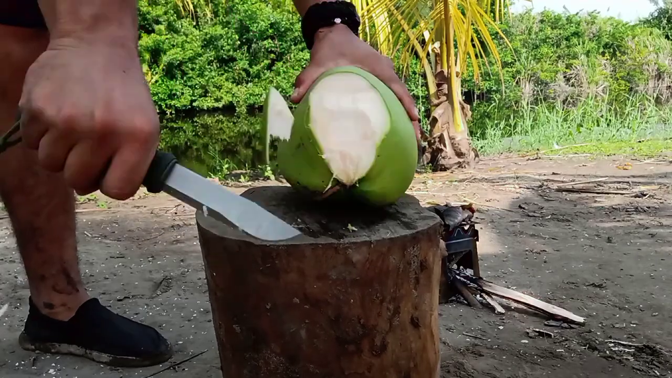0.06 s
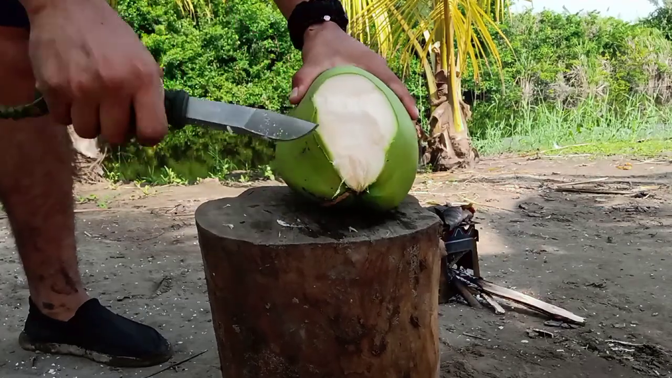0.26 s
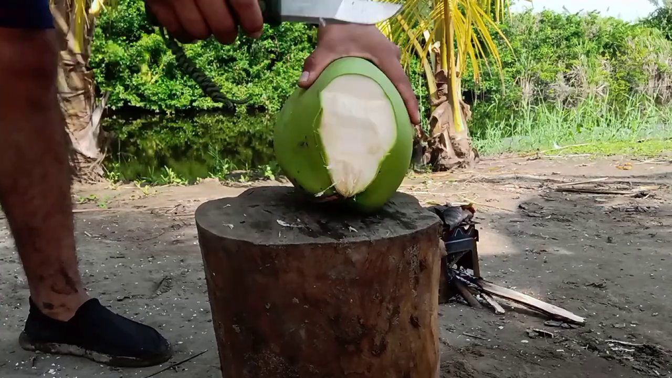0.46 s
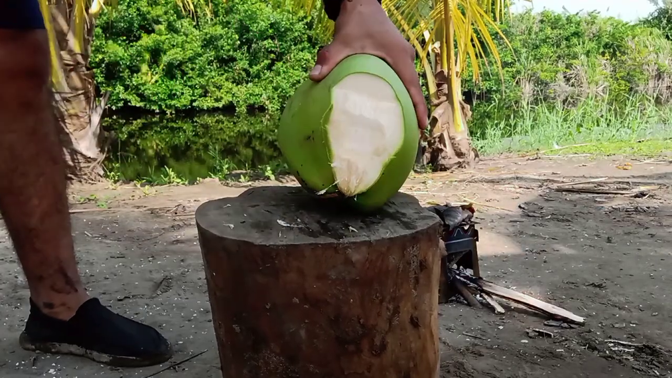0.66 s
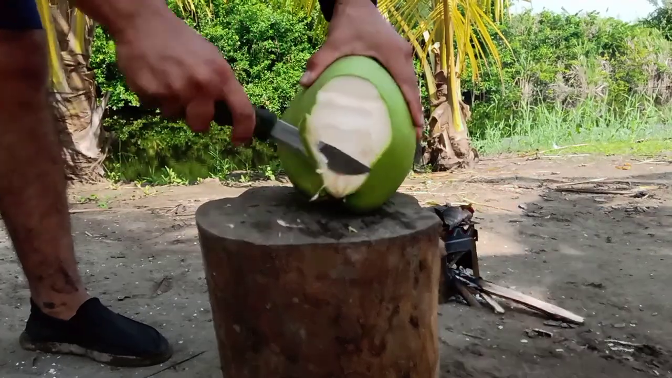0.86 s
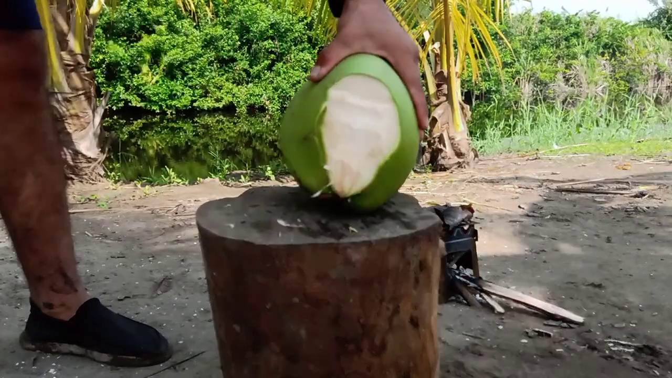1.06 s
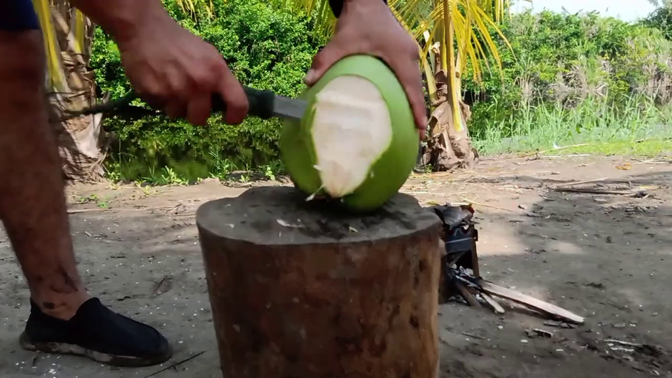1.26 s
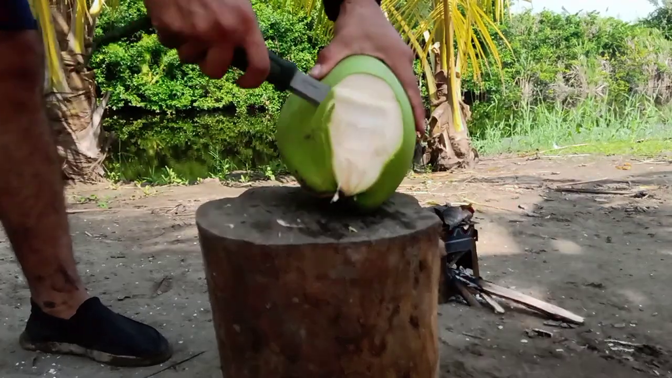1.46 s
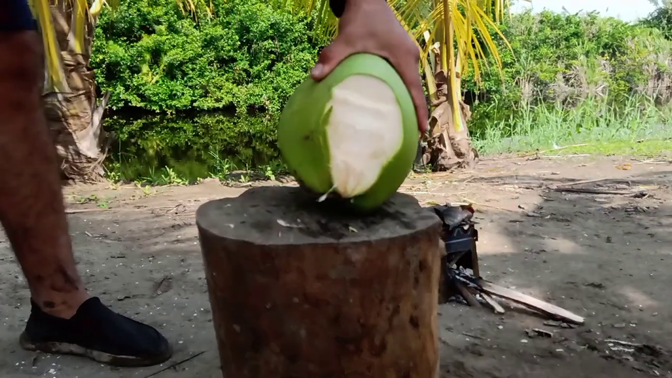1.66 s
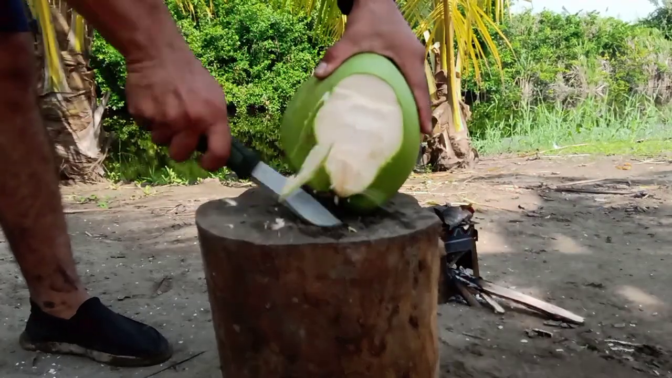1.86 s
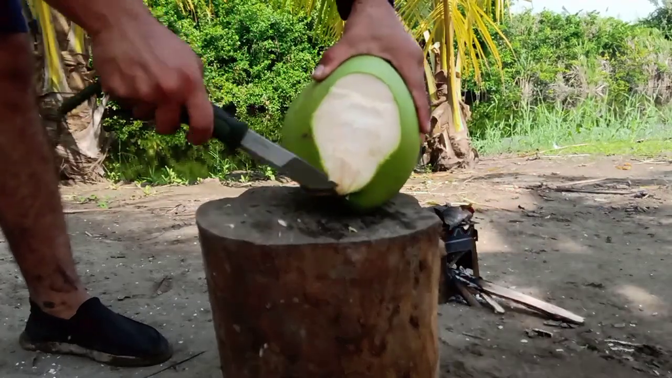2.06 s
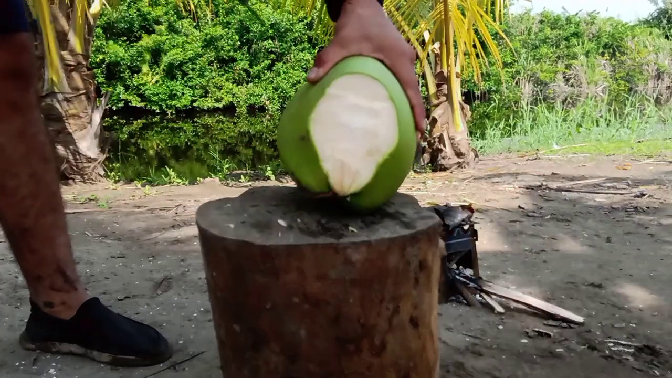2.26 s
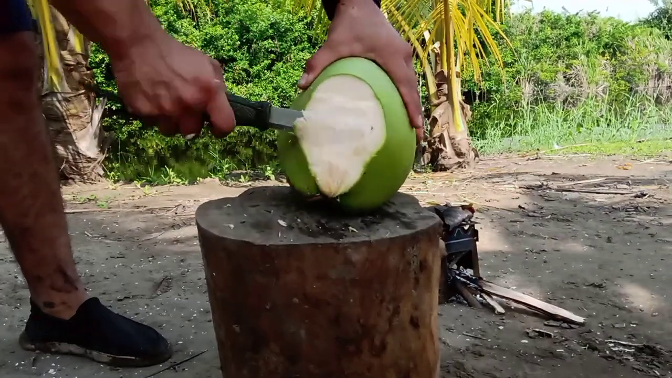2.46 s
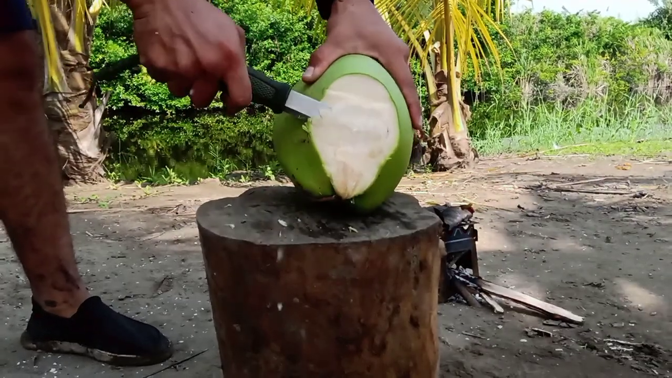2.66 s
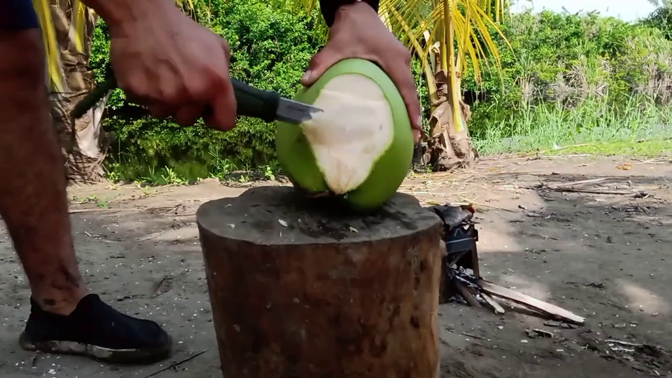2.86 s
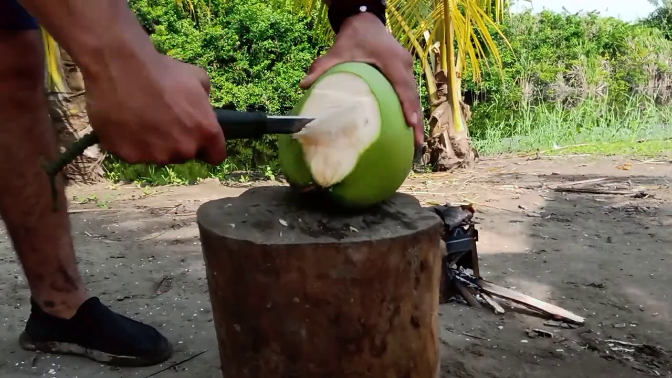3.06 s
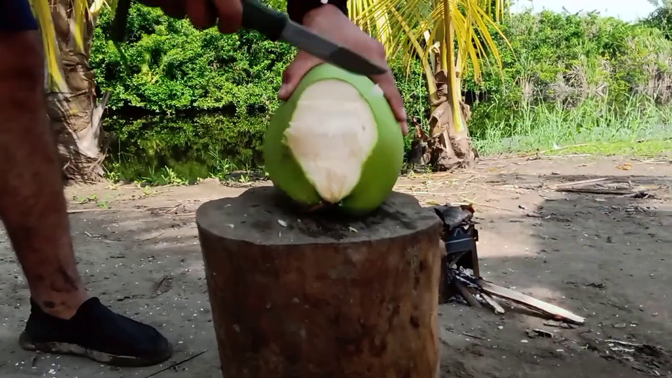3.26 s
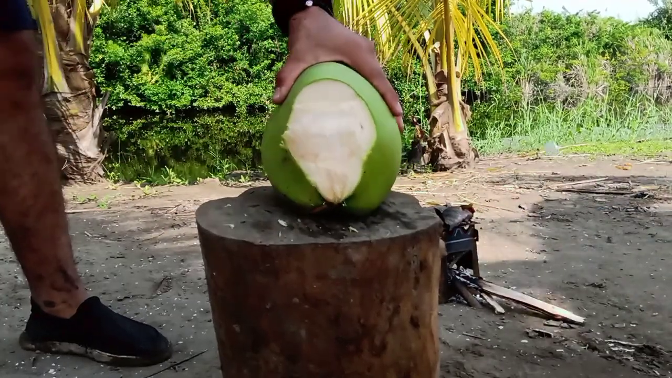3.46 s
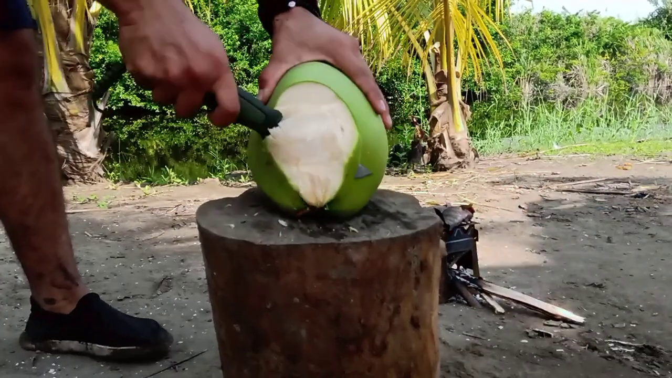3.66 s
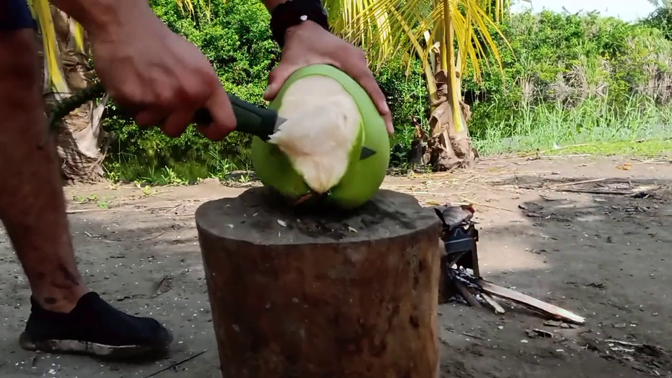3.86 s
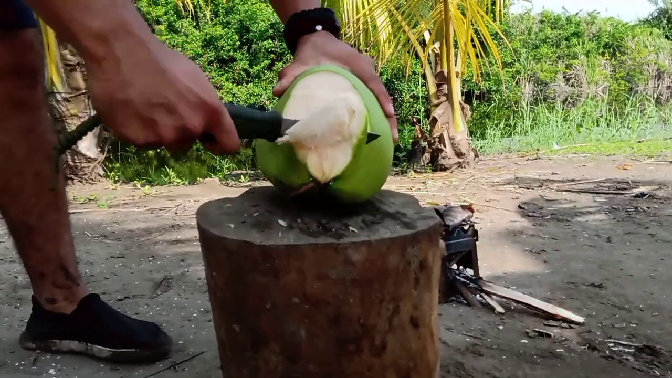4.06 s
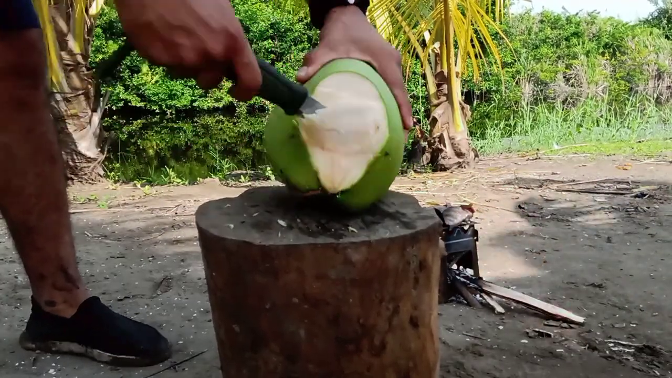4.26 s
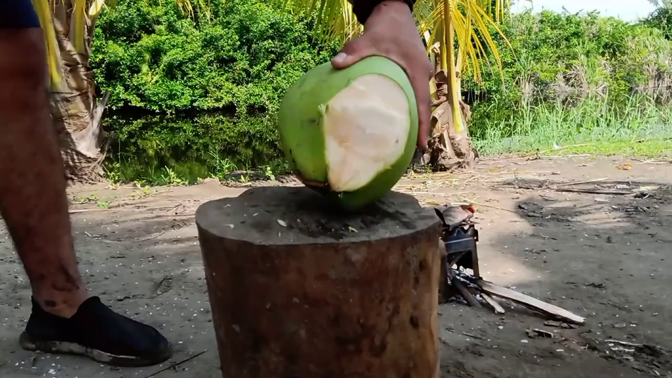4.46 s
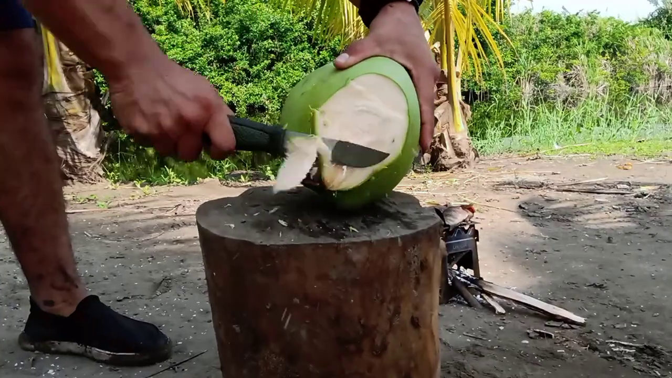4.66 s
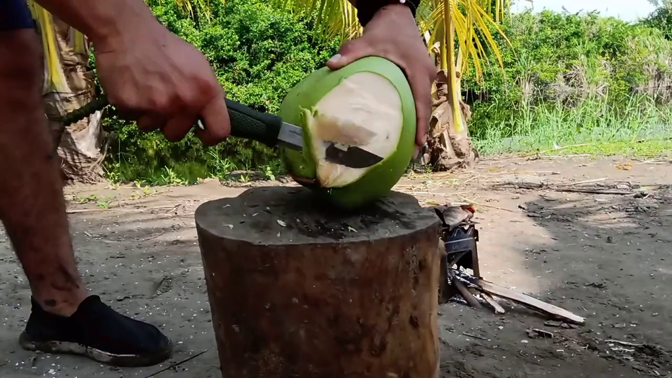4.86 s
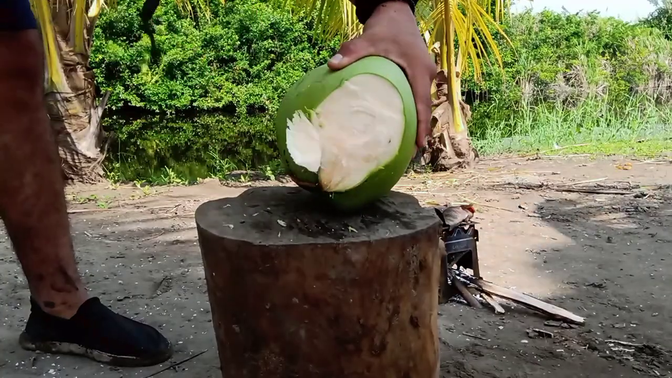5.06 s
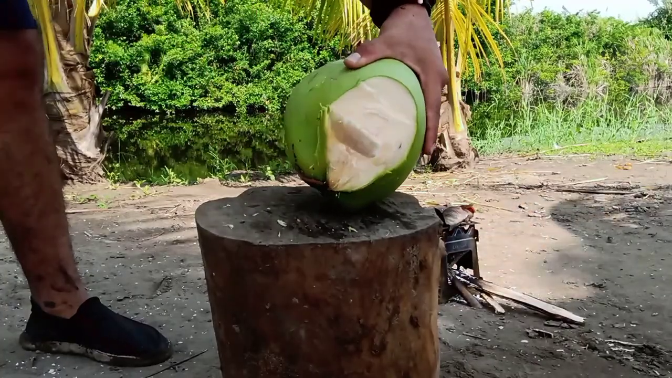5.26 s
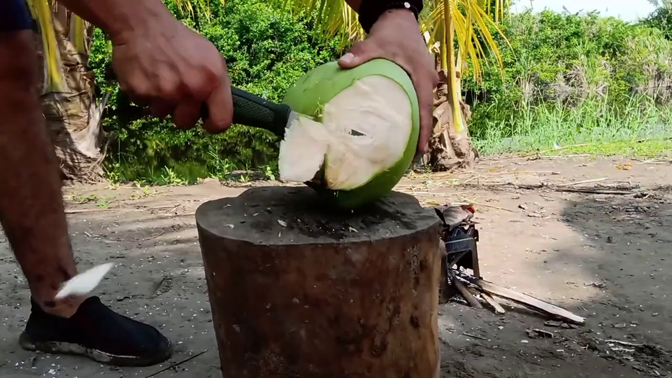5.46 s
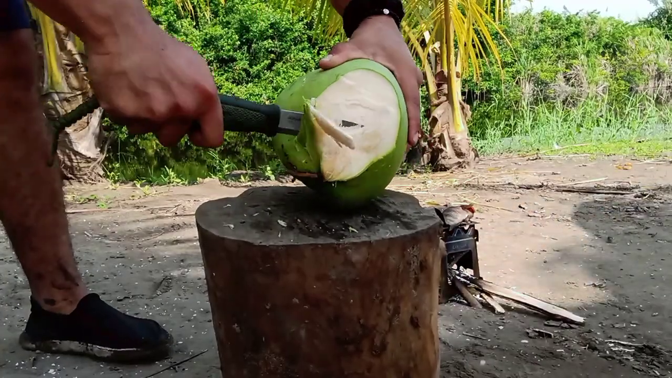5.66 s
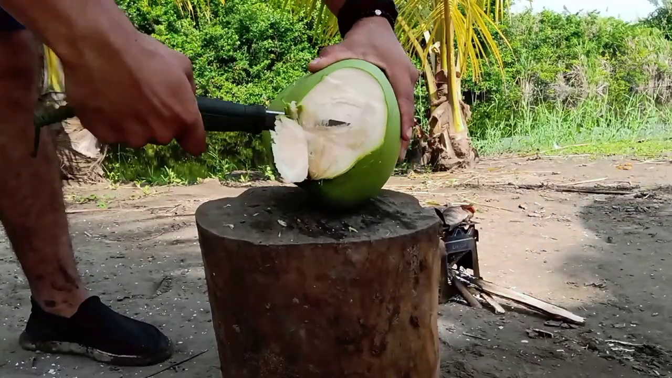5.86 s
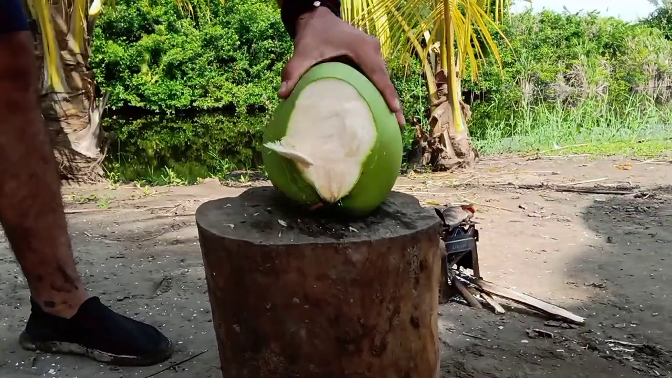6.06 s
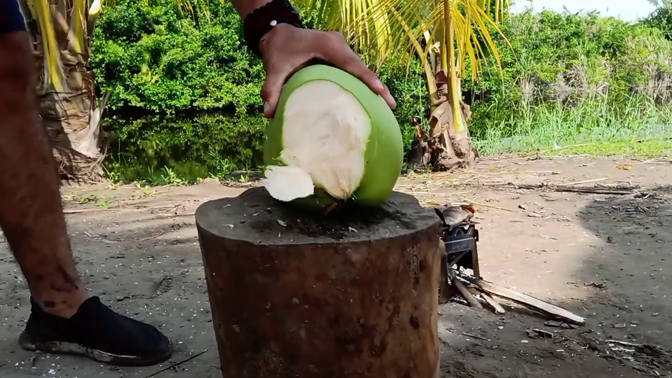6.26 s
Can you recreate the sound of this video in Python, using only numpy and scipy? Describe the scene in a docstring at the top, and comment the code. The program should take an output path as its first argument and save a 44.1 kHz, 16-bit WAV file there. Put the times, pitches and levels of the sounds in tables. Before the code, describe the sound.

Close outdoors, a large knife chops a green coconut resting on a stump. Seven or so sharp woody blows fall roughly half a second to a second apart, each a bright crack, fibrous tear and short hollow knock with a grainy spray. Between them come crackling shaves, little snaps and soft taps. Faint leaf hiss, a distant bird and low wind buffets lie behind; the microphone sounds slightly dull on top.

```python
"""Sharp, woody chops ring out close by: a big knife cuts the husk off a green coconut on a stump, outdoors.
Each chop knocks the nut's damped modes, thuds the stump and bursts a few milliseconds of fibres, then
a grainy spray; taps, crackling shaves and sharp ruptures of husk sound during the chops and between them.
Plants scatter a faint echo of decaying noise. Behind are hissing leaves and distant sounds of shaped noise,
low wind buffets on the microphone and a far bird of sliding, wavering tones."""
import sys
import numpy as np
from scipy import signal
from scipy.fft import rfft, irfft, next_fast_len
from scipy.io import wavfile
from scipy.ndimage import uniform_filter1d

SR = 44100
rng = np.random.default_rng(int(sys.argv[2]) if len(sys.argv) > 2 else 0)


def master_out(mix):
    """Clip the mix to full scale and print it as 16-bit PCM to the path in sys.argv[1]."""
    frames = np.transpose(np.atleast_2d(mix))
    ceiling = np.clip(frames, -1, 1)
    pcm = np.round(ceiling * 32767).astype(np.int16)
    wavfile.write(sys.argv[1], SR, pcm)


N = 278271
TIME = np.arange(N) / SR  # whole scene [s]
HIT = np.arange(4096) / SR  # one short contact [s]


def undb(db):
    """Decibels to gain."""
    return 10 ** (np.asarray(db) / 20)


def unit(x):
    """Scale to rms 1."""
    return x / np.sqrt(np.mean(x ** 2))


def burst(x, db):
    """Scale a short sound to the energy of 10 ms at this level."""
    return x * undb(db) / np.sqrt(np.sum(x ** 2) / (SR / 100))


def add(out, start_s, x):
    """Mix x into out from this time, or from the beginning if the time is negative."""
    i = max(int(start_s * SR), 0)
    out[i:i + len(x)] += x[:N - i]


def band(x, hz, octaves, order=2):
    """Causal band-pass around a centre."""
    edges = [hz * 2 ** (-octaves / 2), hz * 2 ** (octaves / 2)]
    edges = np.clip(edges, 10, SR / 2 - 100)
    return signal.sosfilt(signal.butter(order, edges, "bandpass", fs=SR, output="sos"), x)


def colour(x, points):
    """Shape a spectrum by (frequency [Hz], gain [dB]) points joined on a logarithmic frequency axis."""
    point_hz, point_db = np.transpose(points)
    size = next_fast_len(2 * len(x))
    hz = np.maximum(np.arange(size // 2 + 1) * SR / size, 1)
    gain = undb(np.interp(np.log(hz), np.log(point_hz), point_db))
    return irfft(rfft(x, size) * gain, size)[:len(x)]


def walk(rate):
    """Slow chance of rms 1: random levels held 1 / rate s and slewed twice."""
    hold = int(SR / rate)
    steps = np.repeat(rng.standard_normal(N // hold + 1), hold)
    slewed = uniform_filter1d(uniform_filter1d(steps, hold), hold)
    return unit(slewed[:N])


def fibres(size, per_s, spread_db):
    """Tiny ruptures at random moments, uneven in strength and of either sign."""
    chance = rng.random(size)
    strength = rng.standard_normal(size)
    sign = rng.choice([-1, 1], size)
    return (chance < per_s / SR) * sign * undb(spread_db * strength)


def bite(length_s, release_s):
    """Fibres burst densely while the edge advances and die away once it stops."""
    sinking = np.minimum(0.13 + HIT / (0.7 * length_s), 1)
    release = np.exp(-np.maximum(HIT - length_s, 0) / release_s)
    return fibres(len(HIT), 20000, 2.5) * sinking * release


def plants(x, t60=0.13, build_s=0.041):
    """Ground, trunks and foliage scatter a diffuse echo: noise that builds up, then decays."""
    t = TIME[:SR]
    decay = np.exp(-np.log(1000) * t / t60)
    build = 1 - np.exp(-(t / build_s) ** 2)
    response = rng.standard_normal(SR) * decay * build
    return signal.fftconvolve(x, response / np.linalg.norm(response))[:N]


def wind_strength():
    """Low wind buffets unevenly throughout and freshens once to a light breeze; short gusts ride on it."""
    # gusts at the microphone: (time [s], level [dB])
    gusts = [(3.554, -43.5), (4.125, -52), (4.83, -61), (5.35, -58), (5.841, -53.5)]
    gust_s = 0.032  # rise and fall
    calm_db, breeze_db, freshens_s, freshen_takes_s = -77.5, -68.5, 3.54, 0.96
    base_db = np.interp(TIME, [freshens_s, freshens_s + freshen_takes_s], [calm_db, breeze_db])
    buffets_db = 4.5 * walk(24)
    gusting = sum(undb(db) * np.exp(-((TIME - s) / gust_s) ** 2) for s, db in gusts)
    return undb(base_db + buffets_db) + gusting


def outdoors(distant_db=-27, drone_db=-25):
    """Noise hisses as leaves and comes and goes in faint distant bands; wind buffets the microphone low."""
    # colour of the leaf hiss: (frequency [Hz], gain [dB])
    air = [(30, -17), (100, -11.5), (350, -13), (500, -9), (780, -23), (1050, -30), (1720, -20.5),
           (2610, -15.5), (3620, -13.5), (4200, -7), (5900, -2.5), (7270, -0.5), (7800, -13),
           (10000, -44.5)]
    # leaves and distant outdoors together: (time [s], level [dB])
    background = [(0, -62.5), (.6, -63.5), (1.7, -64.5), (3.4, -61), (4.4, -58.5), (6.3, -61)]
    flutter_db = 0.5 * walk(63) + 0.7 * walk(8)
    leaves = unit(colour(rng.standard_normal(N), air)) * undb(flutter_db)
    # distant bands are set relative to the leaves
    drone = band(rng.standard_normal(N), 500, 0.47) * undb(3 * walk(9))
    distant = unit(drone) * undb(drone_db)
    for hz in np.geomspace(700, 3600, 9):
        far = band(rng.standard_normal(N), hz, 0.2) * undb(4 * walk(16))
        distant += unit(far) * undb(distant_db)
    wind = unit(band(rng.standard_normal(N), 72, 0.97)) * wind_strength()
    return (leaves + distant) * undb(np.interp(TIME, *np.transpose(background))) + wind


def bird():
    """Far whistles that slide to a pitch and waver, blurred by the trees."""
    # whistles before the blur: (time [s], length [s], start pitch [Hz], top pitch [Hz], level [dB])
    whistles = [(.32, 0.11, 1650, 1830, -66.5), (.8, .06, 2400, 2520, -69), (1.59, 0.12, 1925, 2520, -72),
                (3.065, 0.11, 903, 945, -69)]
    out = np.zeros(N)
    for start_s, length_s, start_hz, top_hz, db in whistles:
        t = TIME[:int(length_s * SR)]
        waver = 1 + 0.03 * walk(400)[:len(t)]
        hz = np.interp(t, [0, length_s / 2], [start_hz, top_hz]) * waver
        swell = np.sin(np.pi * t / length_s)
        add(out, start_s, undb(db) * swell * np.sin(2 * np.pi * np.cumsum(hz) / SR))
    return plants(out)


def shaves():
    """The edge creeps through wet husk: crackle and stray thin snaps swell and fade with the pressure."""
    # shaving and rubbing: (time of hardest pressure [s], rise [s], crackle level there [dB], centre [Hz])
    strokes = [(0.019, 0.043, -54.5, 7200), (.8, .014, -52.5, 3200), (1.486, 0.0082, -43, 3660),
               (1.845, 0.008, -37, 5200), (1.98, 0.09, -58, 5200), (2.46, 0.065, -51.5, 6260),
               (2.79, 0.043, -52.5, 3800), (2.96, 0.039, -52, 5520), (3.075, 0.06, -55, 5800),
               (3.18, 0.031, -49, 4380), (3.8, 0.093, -56, 4560), (4.235, 0.11, -52.5, 5800),
               (4.771, 0.12, -70.5, 460), (4.82, 0.18, -52.5, 6200), (5.65, 0.039, -44.5, 4870),
               (5.839, 0.086, -56, 3700)]
    release_share = 0.8  # the pressure falls in this share of its rise
    thin_per_s, thin_db, thin_spread_db = 37, -5, 3.5  # level relative to the crackle
    out = np.zeros(N)
    t = np.arange(-0.4, 0.3, 1 / SR)  # from the hardest pressure
    for peak_s, rise_s, db, hz in strokes:
        pressure = np.exp(-np.abs(t) / np.where(t < 0, rise_s, release_share * rise_s))
        crackle = fibres(len(t), 2400, 5.5)
        thin = fibres(len(t), thin_per_s, thin_spread_db)
        husk = unit(band(crackle, hz, 1.6)) + undb(thin_db) * unit(band(thin, hz, 1.2))
        stroke = undb(db) * pressure * husk
        add(out, peak_s + t[0], stroke[peak_s + t >= 0])
    return out


def snaps(splinter=0.22, strip_hz=4300):
    """One sharp rupture rings the strip of husk, with a short trail of splintering."""
    # sharp ruptures of husk, during chops and between them: (time [s], level [dB], centre [Hz])
    ruptures = [(0.7054, -36.5, 5500), (1.2532, -57, 3870), (2.747, -45, 5050), (2.7921, -41.5, 3760),
                (2.817, -42, 5200), (2.896, -46, 6480), (2.941, -50, 5600), (3.77, -47, 4300),
                (3.782, -47.5, 5000), (3.8266, -32, 3570), (4.4996, -46.5, 5000), (4.608, -26, 1704),
                (4.618, -35.5, 5500), (4.627, -35, 5740), (4.7591, -48.5, 5750), (4.8335, -46, 6000),
                (5.308, -26.5, 4540), (5.5572, -42, 3275), (5.607, -39.5, 4580), (5.6441, -44, 4400)]
    out = np.zeros(N)
    for start_s, db, hz in ruptures:
        force = splinter * bite(0.0004, 0.0013)
        force[0] += 1
        strip = band(band(force, hz, 0.95, order=1), strip_hz, 2.2, order=3)
        add(out, start_s, burst(strip, db))
    return out


def knocks(rattle_db=-7, rattle_s=0.015):
    """Soft contacts: a dead wooden tap and a slight rattle under a tick of husk."""
    # light knocks of blade, chips and rocking nut:
    # (time [s], contact [s], wood level [dB], wood centre [Hz], tick level [dB])
    contacts = [(0.2638, 0.00037, -43.5, 590, -42.5), (0.2747, 0.00089, -47, 352, -42.5),
                (0.907, 0.0019, -54.5, 517, -46), (1.8525, 0.0027, -39.5, 820, -68),
                (2.016, 0.0059, -51.5, 895, -50.5), (2.0928, 0.00066, -46.5, 493, -51.5),
                (6.004, 0.034, -59.5, 710, -50)]
    out = np.zeros(N)
    for start_s, length_s, wood_db, wood_hz, tick_db in contacts:
        tap = burst(band(np.exp(-HIT / 0.0001), wood_hz, 0.96), wood_db)
        rattle = burst(band(bite(length_s, rattle_s), wood_hz, 1.14, order=1), wood_db + rattle_db)
        tick = burst(band(bite(length_s, 0.0021), 5340, 0.69, order=1), tick_db)
        add(out, start_s, tap + rattle + tick)
    return out


def spray(early_t60=0.22, late_t60=0.88, late_db=-14, build_s=0.012):
    """Grainy hiss after a chop: juice and shreds fly off while ground and foliage scatter the blow."""
    # colour of the spray: (frequency [Hz], gain [dB])
    spray_colour = [(40, -4), (110, 5), (300, -14), (600, -3.5), (1000, -8.5), (2200, -6.5), (3500, -7.5),
                    (5500, 5), (7500, -3)]
    t = TIME[:int(0.7 * SR)]
    fade = undb(-60 * t / early_t60) + undb(late_db - 60 * t / late_t60)
    build = 1 - np.exp(-(t / build_s) ** 2)
    shreds = fibres(len(t), 3000, 5.5)
    return unit(colour(shreds, spray_colour)) * fade * build


def nut(group_dbs, lowest_hz=450):
    """Damped modes of the nut on its stump, in three groups: hollow mode, knock pair, upper modes."""
    # hollow mode, two knock modes, then upper modes:
    # (frequency [Hz], 60 dB decay [s], level within its group [dB])
    modes = [(523, 0.03, 0), (726, 0.026, 2), (813, 0.028, 1.5), (1185, 0.021, -0.5), (1267, 0.022, 3),
             (1595, .016, 1.5), (2700, 0.014, -6)]
    rings = []
    for hz, t60, db in modes:
        decay = np.exp(-np.log(1000) * HIT / t60)
        rings.append(undb(db) * decay * np.cos(2 * np.pi * hz * HIT))
    groups = rings[0], rings[1] + rings[2], sum(rings[3:])
    # so small a body radiates little bass, and the soft husk passes it little treble
    radiation = signal.butter(3, [lowest_hz, 2600], "bandpass", fs=SR, output="sos")
    return sum(burst(signal.sosfilt(radiation, group), db) for group, db in zip(groups, group_dbs))


def chops():
    """Knock of the nut, thud and shudder of the stump, tearing husk, a bright crack and its spray."""
    # chops, one of which cracks and then goes through to the stump:
    # (time [s], bite length [s], hollow level [dB], knock level [dB], tearing level [dB],
    # crack level [dB], crack centre [Hz])
    blows = [(0.6978, 0.0027, -35, -26, -28, -23, 5230), (1.1873, 0.002, -35.5, -25.5, -30.5, -19.5, 5740),
             (1.7972, 0.0058, -26.5, -28.5, -21.5, -25, 5200),
             (1.804, 0.0032, -47.5, -41.5, -38.5, -22.5, 5950), (1.812, .0047, -42, -33.5, -25, -34, 5000),
             (2.4107, 0.00063, -39.5, -34.5, -27, -17.5, 5860),
             (3.4962, .005, -32, -25.5, -23, -25.5, 5690), (4.606, 0.0053, -44, -26.5, -20.5, -21, 5880),
             (5.2995, 0.0046, -42.5, -25, -19.5, -28.5, 5040)]
    # colour of tearing husk: (frequency [Hz], gain [dB])
    tearing = [(400, -31.5), (1000, -3), (1600, -3), (2300, 0), (2900, 1), (4200, 0), (7000, -2)]
    typical_bite_s, spray_db = 0.0043, -38
    # a longer bite is a slower push: it rings the upper modes less and moves the stump more
    upper_db, upper_db_per_doubling = -9.5, -4  # relative to the knock
    stump_db, stump_db_per_doubling = -20, 3.5  # relative to the knock
    shudder_db, shudder_hz, shudder_s = -6, 90, 0.03  # level relative to the thud
    out = np.zeros(N)
    t = TIME[:SR // 4]
    for start_s, length_s, hollow_db, knock_db, tear_db, crack_db, crack_hz in blows:
        doublings = np.log2(length_s / typical_bite_s)
        group_dbs = hollow_db, knock_db, knock_db + upper_db + upper_db_per_doubling * doublings
        thud_db = knock_db + stump_db + stump_db_per_doubling * doublings
        thud = burst(band(np.exp(-HIT / 0.0011), 190, 1.0), thud_db)
        shudder = band(rng.standard_normal(len(t)), shudder_hz, 0.92) * t * np.exp(-t / shudder_s)
        tear = burst(colour(bite(length_s, 0.0026), tearing), tear_db)
        crack = burst(band(bite(length_s, 0.00097), crack_hz, 0.4), crack_db)
        add(out, start_s, tear + crack)
        # the force on the nut peaks once the edge is some way in
        add(out, start_s + 0.12 * length_s, nut(group_dbs) + thud)
        add(out, start_s, burst(shudder, thud_db + shudder_db))
        add(out, start_s, undb(spray_db) * spray())
    return out


def scene():
    """The work at the stump, the echo of its small sounds, and the surroundings."""
    small = knocks() + snaps() + shaves()
    work = chops() + small + undb(-17) * plants(small)
    return (work + outdoors() + bird())[None]


def record(dry, soft_hz=7250, top_hz=7800, ceiling=0.86):
    """The microphone passes little above 8 kHz and just rounds the sharpest peaks."""
    soft = signal.sosfilt(signal.butter(6, soft_hz, fs=SR, output="sos"), dry)
    narrow = signal.sosfilt(signal.ellip(8, 0.2, 70, top_hz, fs=SR, output="sos"), soft)
    rounded = narrow / (1 + (narrow / ceiling) ** 4) ** (1 / 4)
    # the rounding adds overtones; a last low-pass limits them
    return signal.sosfilt(signal.ellip(8, 0.2, 70, 15500, fs=SR, output="sos"), rounded)


dry = scene()
out = record(dry)
master_out(out)
```